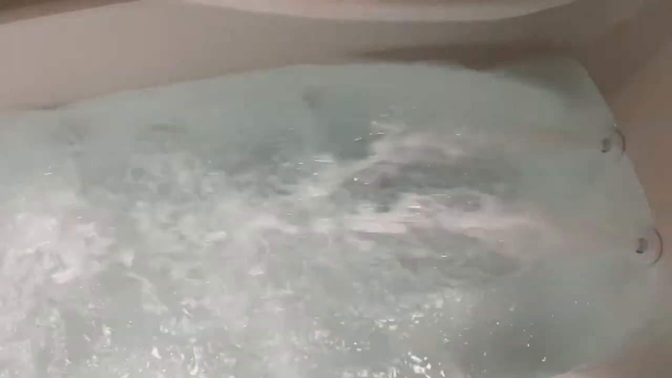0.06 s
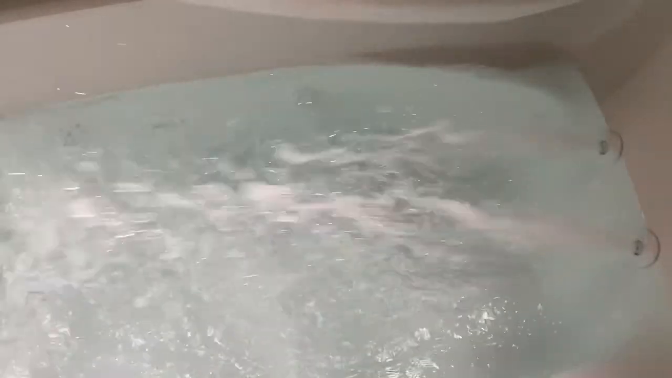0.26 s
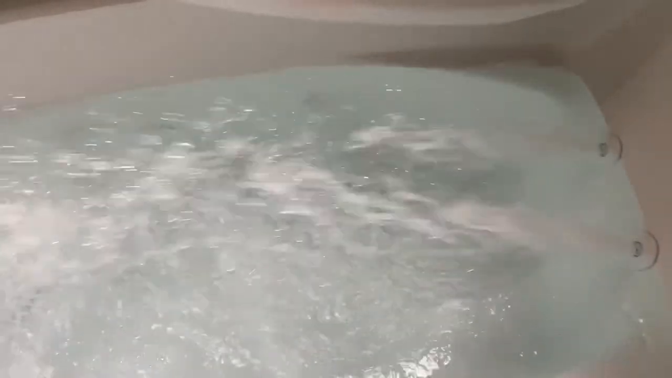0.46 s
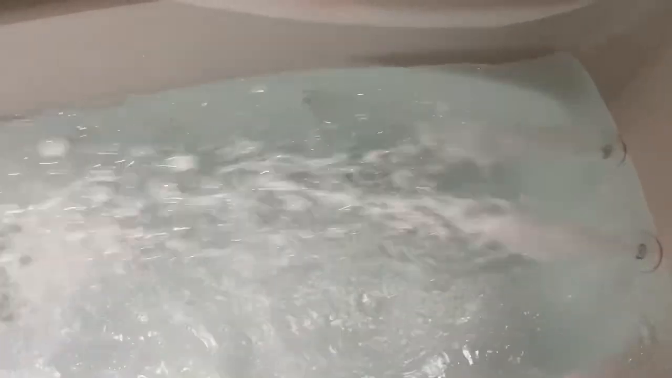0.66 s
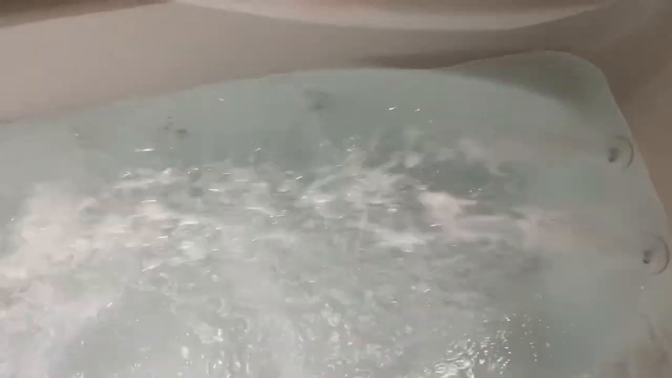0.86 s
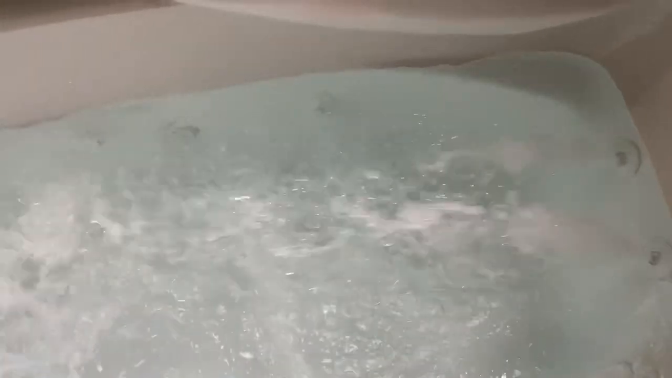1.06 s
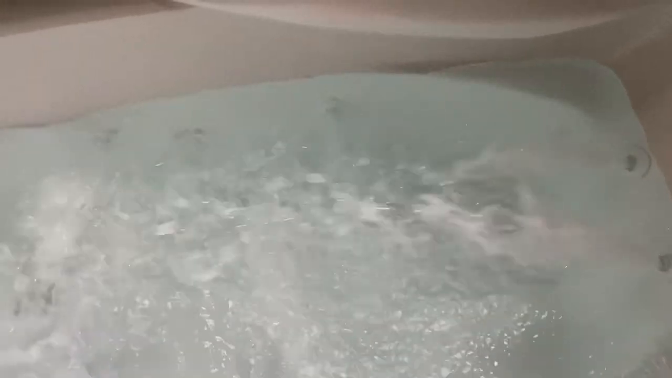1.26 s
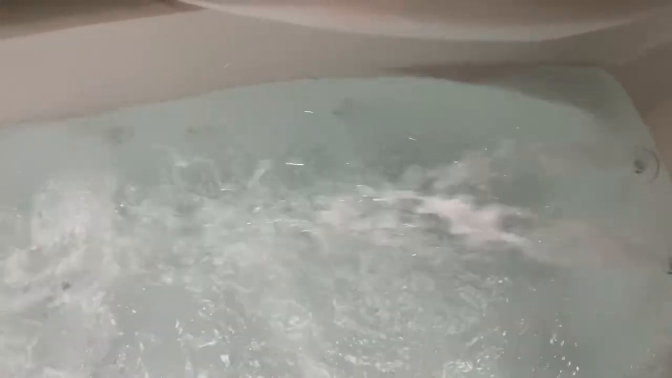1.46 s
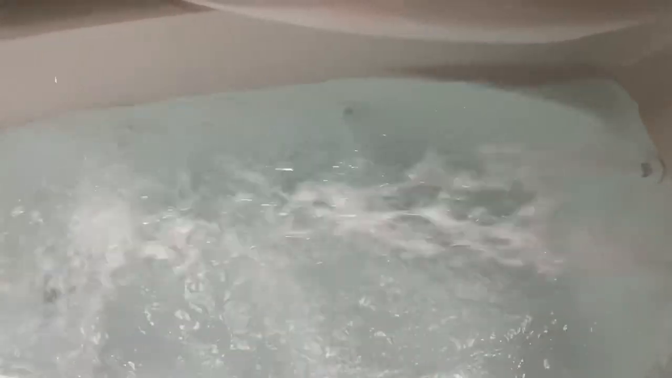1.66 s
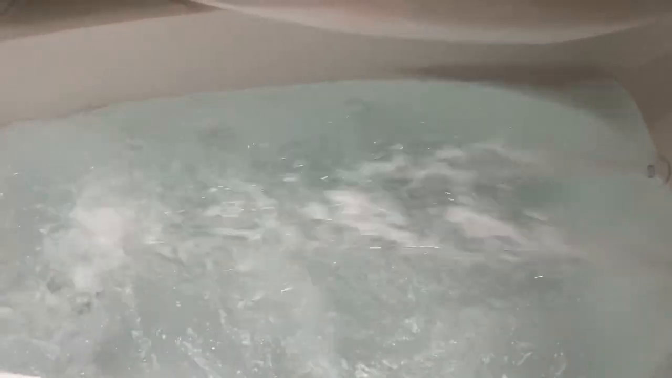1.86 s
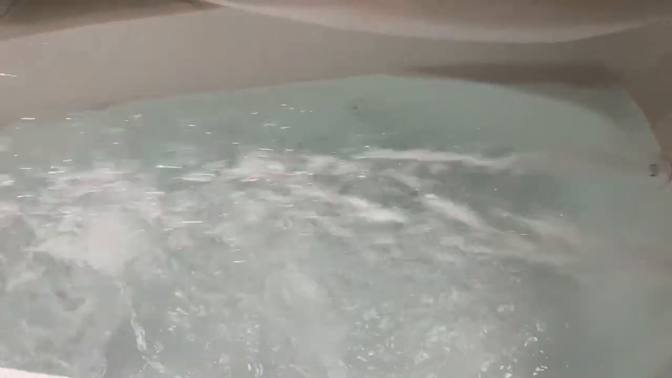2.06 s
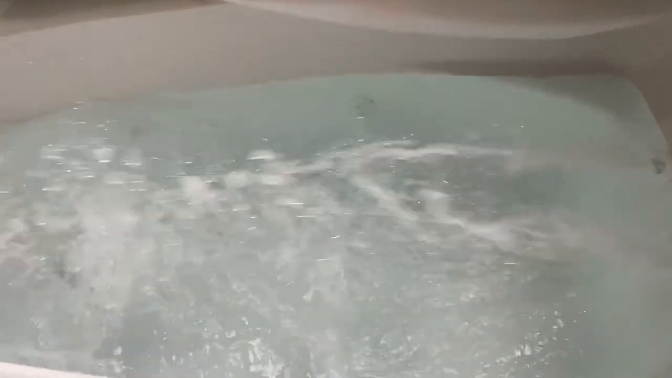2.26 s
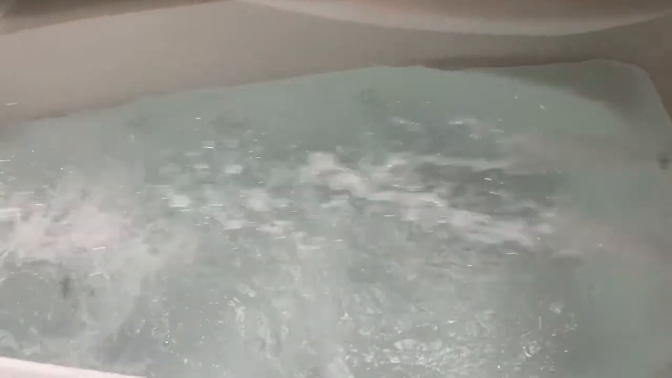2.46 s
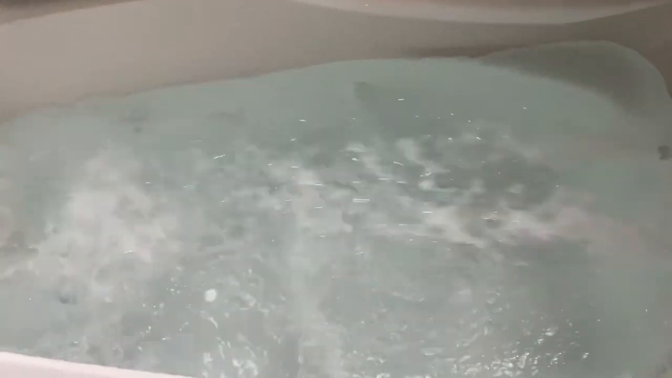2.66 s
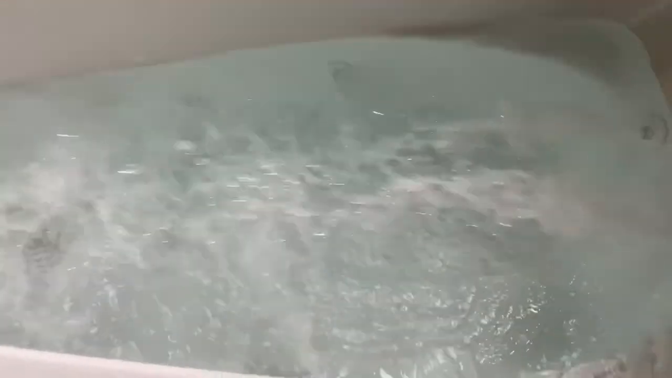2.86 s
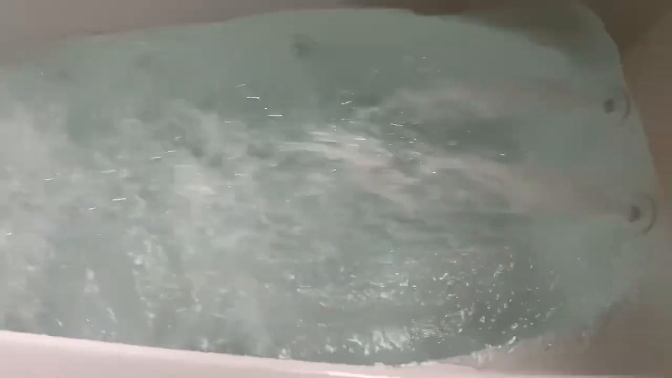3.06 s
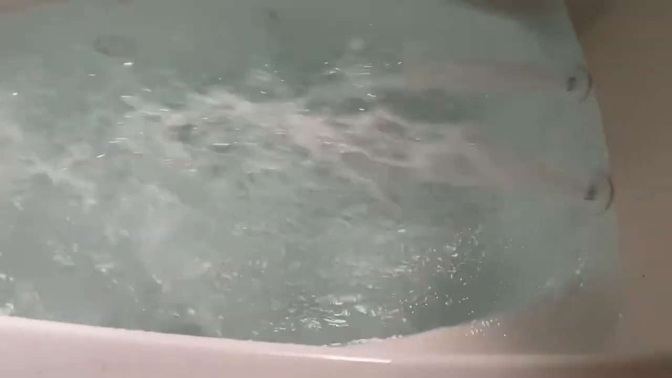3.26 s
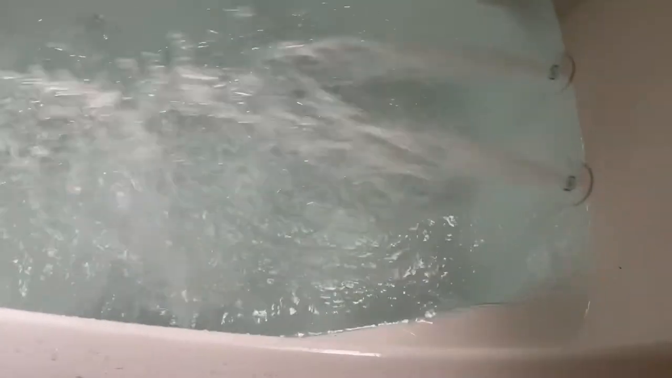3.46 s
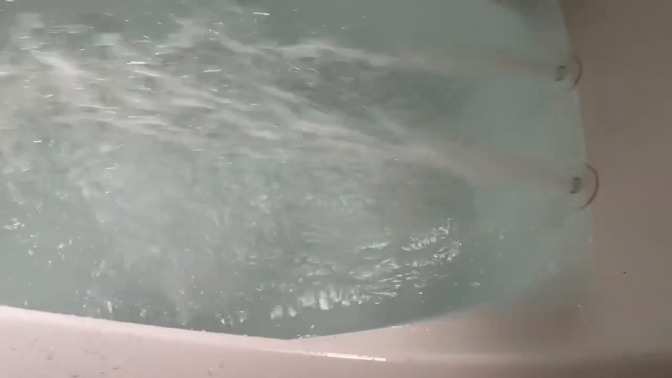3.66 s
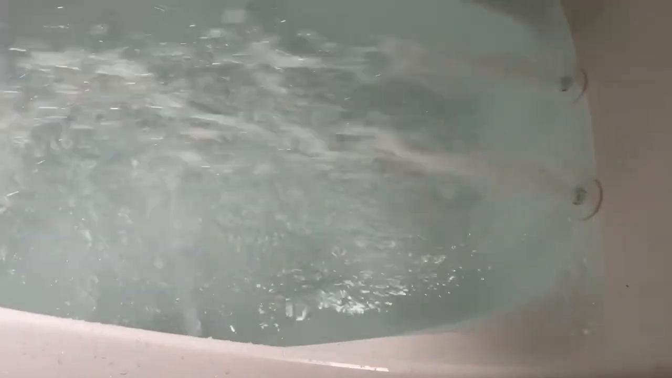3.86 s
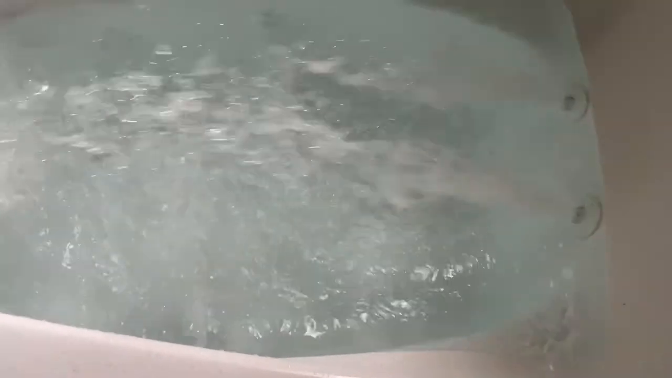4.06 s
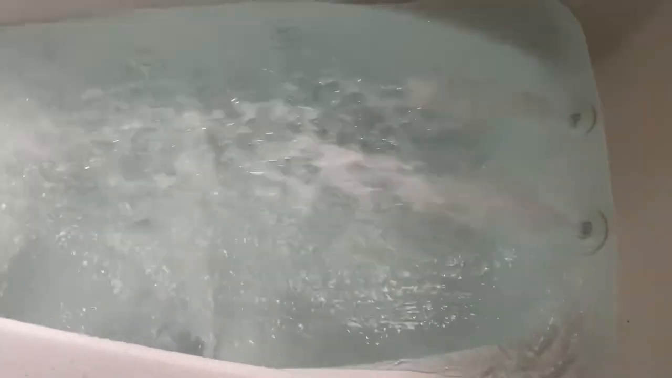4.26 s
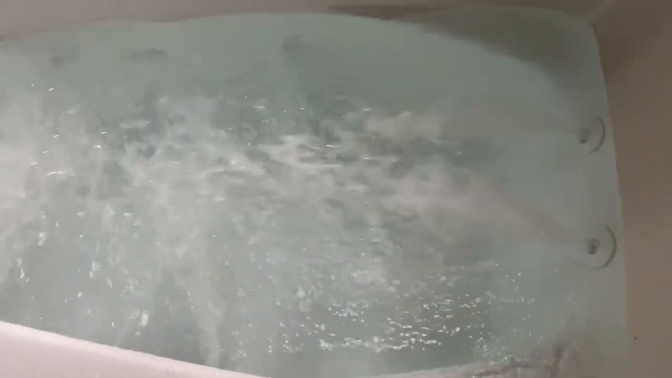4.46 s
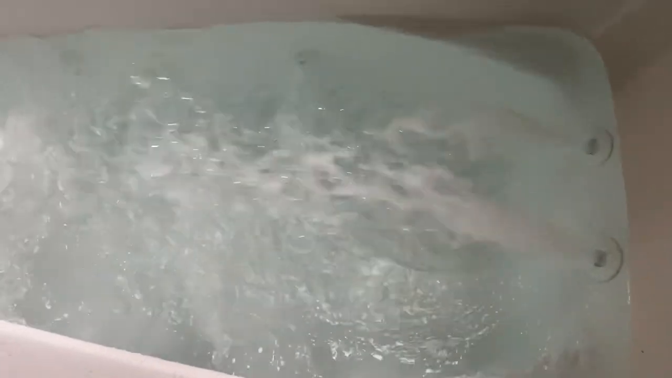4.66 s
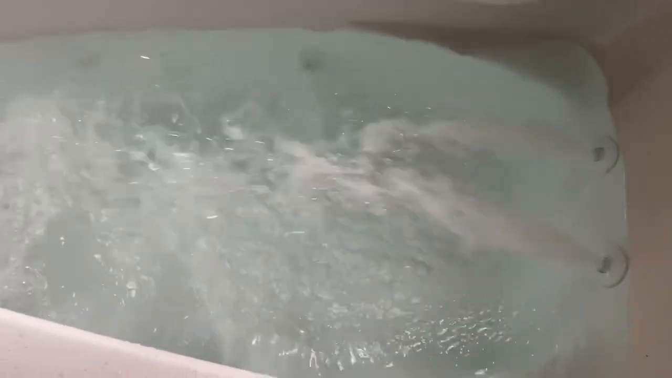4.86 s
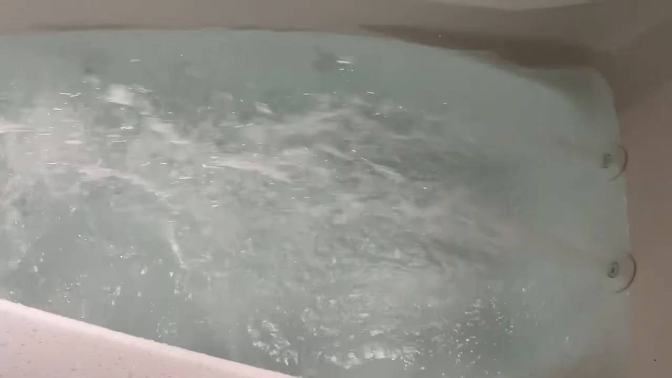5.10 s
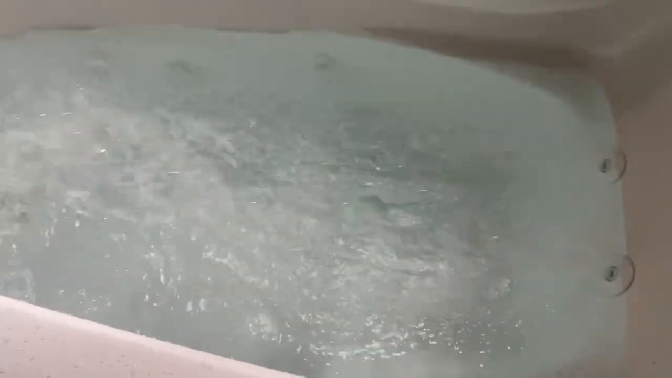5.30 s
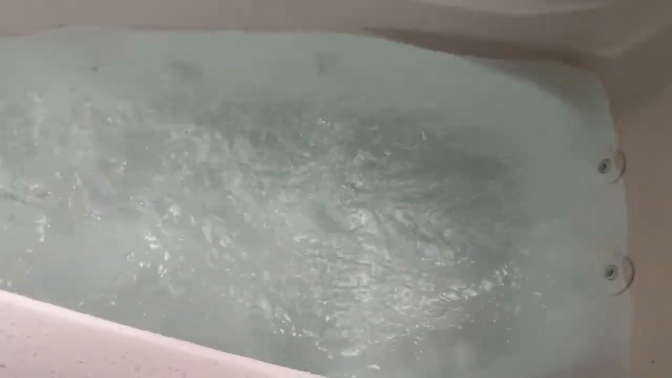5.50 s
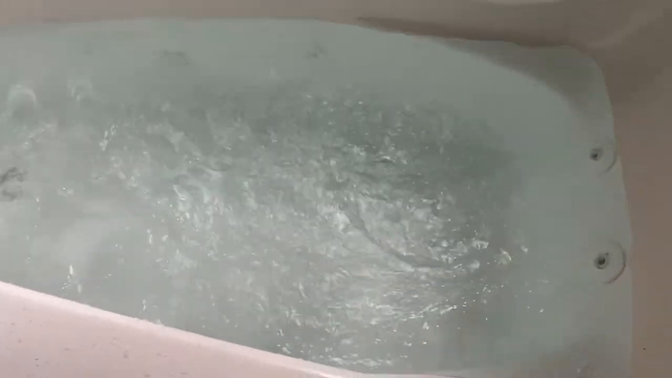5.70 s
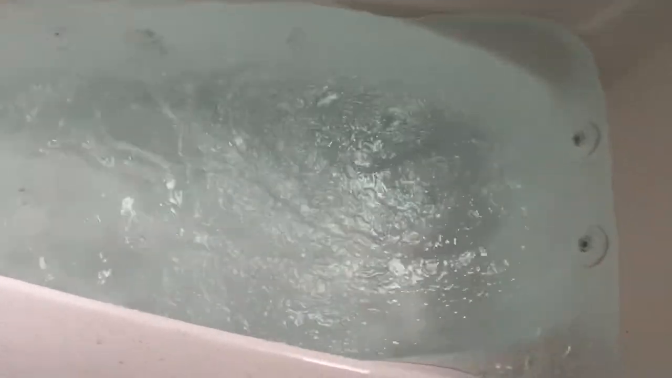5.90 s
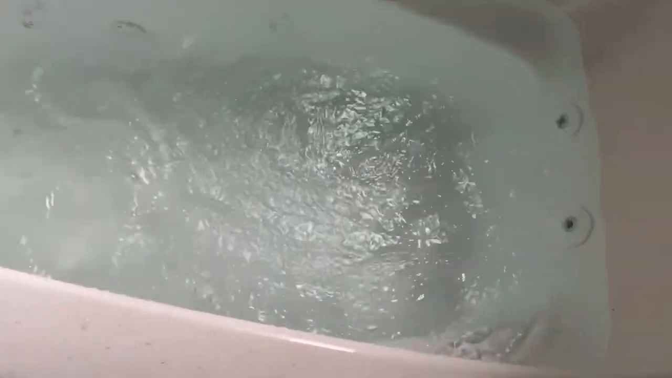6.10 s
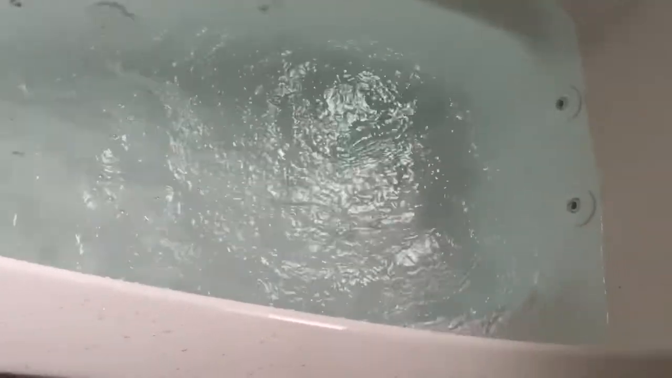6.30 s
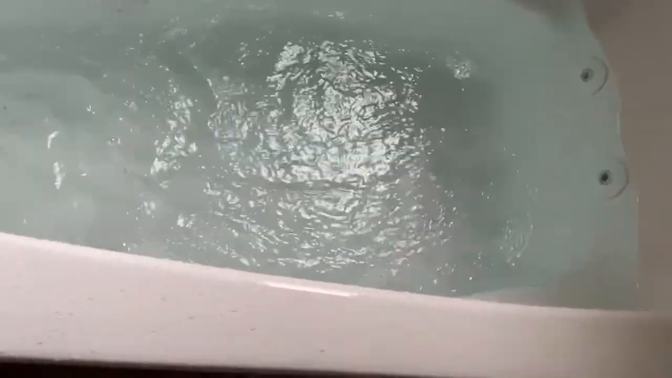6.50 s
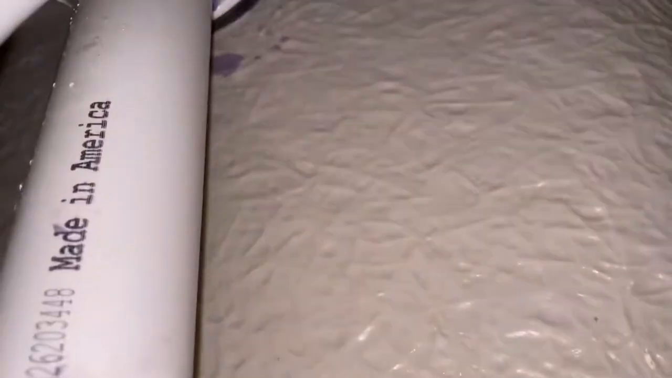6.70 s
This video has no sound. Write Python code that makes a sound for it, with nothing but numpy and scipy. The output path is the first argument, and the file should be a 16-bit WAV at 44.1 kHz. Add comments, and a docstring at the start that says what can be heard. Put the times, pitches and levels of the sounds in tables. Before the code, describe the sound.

From the start a jetted bathtub is at full power: a broad, wet churning of ringing bubbles and froth, hissing spray, and low tub rumble with a hollow pipe note and a steady low motor hum. Splashes brighten and swell around 0.4-0.9 s, with a heavy thump near 0.65, again at 2.1-2.6 with sharp slaps, and most strongly at 3.5-4.2, with a deep thump at 3.9. Gurgles and single bubble blips poke through. At about 5.0 the low drive falls away; a last splashy spurt comes at 5.2, and by 5.4 the roar has collapsed. Faint crackling foam, small gliding plops and low residual rumble fade through 5.5-6.4, with a soft lap at 6.4. After an instant of silence, at 6.54 a deep, lumpy, booming gush starts abruptly and continues to the end. Close stereo perspective, short hard-walled room tail.

```python
'''A jetted bathtub runs in a small bathroom: pump harmonics hum, and noise drives the low modes of tub and room.
Ringing bubbles, noisy froth, slaps and spray churn on top, louder whenever the bath swells and the jets break through.
Then the jets stop with a last spurt of the same layers, leaving crackling foam, a few gliding plops and a soft wash.
After an instant of silence the sound changes abruptly to a deeper gush: lumpy noise over a booming tub.'''
import sys
import numpy as np
from scipy import signal
from scipy.fft import rfft, irfft, next_fast_len
from scipy.io import wavfile
from scipy.ndimage import uniform_filter1d

SR = 44100
rng = np.random.default_rng(int(sys.argv[2]) if len(sys.argv) > 2 else 0)


def inscribe(sig):
    """Save sig as 16-bit PCM at rate SR to the path in sys.argv[1].

    A 1-D sig is mono; a 2-D sig holds one channel per row.
    Samples are clipped to [-1, 1] before scaling.
    """
    pcm = np.round(np.clip(np.atleast_2d(sig).T, -1, 1) * 32767)
    wavfile.write(sys.argv[1], SR, pcm.astype(np.int16))


N = 297234


def from_db(db):
    """Turns decibels into a plain factor for the wave."""
    return 10 ** (np.asarray(db) / 20)


def rms_one(x):
    """Scales a sound to an average strength (rms) of 1."""
    return x / np.sqrt(np.mean(x ** 2) + 1e-20)


def in_time(rows):
    """The columns of a curve at every sample."""
    s, *columns = np.transpose(rows)
    return [np.interp(np.arange(N) / SR, s, c) for c in columns]


def at_hz(points, hz):
    """Reads a table on a log-frequency axis."""
    table = np.array(points)
    return np.interp(np.log(np.maximum(hz, 1)), np.log(table[:, 0]), table[:, 1])


def add(out, s, sound):
    """Mixes a sound in from time s."""
    size = out.shape[-1]
    start = int(np.clip(s * SR, 0, size - 1))
    out[..., start:start + sound.shape[-1]] += sound[..., :size - start]


def held(start_s, hold_s, attack_s, fall_db_per_s):
    """An envelope that rises, holds until hold_s after its start and dies away."""
    t = np.arange(N) / SR - start_s
    return np.clip(t / attack_s, 0, 1) * from_db(-fall_db_per_s * np.maximum(t - hold_s, 0))


def drift(rate):
    """Slow random wandering of spread 1, smoothed above about rate (Hz)."""
    # drawn once every 40 samples, then joined by straight lines
    r = np.exp(-80 * np.pi * rate / SR)
    noise = rng.standard_normal(N // 40 + 2002)
    slow = signal.lfilter([1], [1, -2 * r, r * r], noise)[2000:]
    return np.interp(np.arange(N) / 40, np.arange(len(slow)), rms_one(slow))


def bursts(per_s, decay_s):
    """Power of random bursts that start at once and die away; mean 1."""
    hits = (rng.random(N) < per_s / SR) * np.minimum(rng.exponential(1, N), 4) ** 2
    power = signal.lfilter([1], [1, -np.exp(-1 / (decay_s * SR))], hits + 1e-12)
    return power / power.mean()


def coloured(x, spectrum):
    """Gives a sound a spectrum; rms 1."""
    size = next_fast_len(N)
    gain = from_db(at_hz(spectrum, np.arange(size // 2 + 1) * SR / size))
    return rms_one(irfft(rfft(x, size) * gain, size)[..., :N])


def flickering(power, spectrum):
    """Coloured noise whose strength follows a power curve; rms 1."""
    return coloured(rng.standard_normal((2, N)) * np.sqrt(power), spectrum)


def splashing(spectrum, per_s, decay_s, wide_share, narrow_share):
    """Half-octave bands of noise: a smooth bed, broad bursts in all bands and narrow ones in each; rms 1."""
    edges = np.geomspace(250, 16000, 13)
    white = rng.standard_normal((2, 2, N))
    wide = bursts(per_s, decay_s)
    bed = max(1 - wide_share - narrow_share, 0)
    out = 0
    for k, band in enumerate(zip(edges, edges[1:])):
        noise = signal.sosfilt(signal.butter(2, band, "band", fs=SR, output="sos"), white[k % 2])
        power = bed + wide_share * wide + narrow_share * bursts(per_s, decay_s)
        out = out + noise * np.sqrt(power)
    return coloured(out, spectrum)


def booming(modes):
    """Turbulence keeps low modes ringing at an even strength, with dark valleys between them; rms about 1."""
    out = 0
    for hz, width_hz, level_db in modes:
        r = np.exp(-np.pi * width_hz / SR)
        resonance = [1, 0, -1, 1, -2 * r * np.cos(2 * np.pi * hz / SR), r * r]
        # one second of run-up is cut off, so the mode already rings at the start
        ringing = signal.sosfilt([resonance, resonance], rng.standard_normal((2, N + SR)))[:, SR:]
        out = out + from_db(level_db) * rms_one(ringing)
    return out / np.sqrt(uniform_filter1d(out ** 2, size=6000, axis=1) + 1e-9)


def wandering(x, share, rate):
    """Lets the pitch of a sound stray a little, as the water in a pipe shifts."""
    at = np.cumsum(1 + share * drift(rate))
    return np.array([np.interp(at, np.arange(N), channel) for channel in x])


def deepened(x, deep_db, deep_hz):
    """Raises or lowers the part of a sound below deep_hz over time."""
    deep = signal.sosfiltfilt(signal.butter(2, deep_hz, fs=SR, output="sos"), x)
    return x + (from_db(deep_db) - 1) * deep


ROOM_T60_S = 0.25  # time in which the room tail falls by 60 dB


def bathroom(x, wet_db):
    """Direct sound in the middle, and a short tail from hard walls: (middle, side)."""
    t = np.arange(SR // 2) / SR
    tail = rng.standard_normal((2, len(t))) * from_db(-60 * t / ROOM_T60_S) * (t > .002)
    response = from_db(wet_db) * tail / np.sqrt(np.sum(tail[0] ** 2))
    response[0, 0] += 1  # the direct sound
    return signal.fftconvolve(x[None], response, axes=1)[:, :N]


def bubble(hz, t60, rise):
    """A bubble rings and climbs in pitch as it nears the surface."""
    t = np.arange(int(t60 * SR) + 2) / SR
    tone = np.sin(2 * np.pi * hz * t * (1 + rise * t / t60 / 2))
    return tone * from_db(-60 * t / t60) * (1 - np.exp(-t * hz))


def crowd(low_hz, high_hz, cycles, rise, size_db, wet_db, count, size=N):
    """Bubbles of all sizes burst at random moments and places, a few much louder than the rest: (middle, side)."""
    out = np.zeros((2, size))
    for when, pitch, bulk, damping, climb, place in rng.random((count, 6)):
        hz = low_hz * (high_hz / low_hz) ** pitch
        strength = from_db(size_db * min(-np.log(1 - bulk), 3)) * hz
        sound = strength * bubble(hz, cycles * (.5 + damping) / hz, 2 * rise * climb)
        add(out, when * size / SR, np.outer([1, 2 * place - 1], sound))
    return (bathroom(out[0], wet_db) + bathroom(out[1], wet_db)[::-1])[:, :size]


# How strong the pump is. Each row: time in seconds, level in dB.
PUMP_LEVEL = [(0, -6.5), (3.0, -1.5), (3.6, 1), (5.0, -1.5), (5.25, -19), (5.5, -50)]
# The notes of the motor. Each row: multiple of the mains pitch, level in dB before the pump level is added.
MOTOR_HUM = [(1, -41.5), (2, -42), (3, -50), (4, -42.5), (14, -49.5)]
MAINS_HZ = 60.25


def pump(waver_db=3.0, sway_rad=0.36):
    """Mains harmonics of the motor, wavering with the load."""
    turn = 2 * np.pi * MAINS_HZ * np.arange(N) / SR
    hum = 0
    for multiple, level_db in MOTOR_HUM:
        strength = from_db(level_db + waver_db * drift(4.5)) * np.sqrt(2)
        hum = hum + strength * np.sin(multiple * turn + sway_rad * drift(3.3))
    return hum * from_db(in_time(PUMP_LEVEL)[0]) * [[1], [0]]  # middle only


# The colour of the foam. Each row: pitch in Hz, gain in dB.
FOAM_COLOUR = [(150, -6), (500, -10), (1200, -19), (2300, -17), (3100, 1.5), (4000, 0), (6000, -9),
               (10000, 6.5), (13000, 3), (15500, -1)]
# The foam left on the surface. Each row: time in seconds, level in dB.
FOAM_LEVEL_CURVE = [(0, -38.5), (5.5, -45), (5.9, -50), (6.2, -53), (6.5, -62)]


def foam():
    """The foam on the surface crackles faintly in tiny bursts and thins out, faster once the jets stop."""
    crackle = flickering(1 + bursts(per_s=300, decay_s=0.0046), FOAM_COLOUR)
    return from_db(in_time(FOAM_LEVEL_CURVE)[0]) * crackle


def drips(level_db=-68):
    """Small stray bubbles keep surfacing, ever fainter, as the bath settles."""
    level = from_db(level_db) * held(start_s=5.35, hold_s=0.69, attack_s=.015, fall_db_per_s=87)
    strays = crowd(low_hz=600, high_hz=1500, cycles=35, rise=.3, size_db=0, wet_db=-10, count=800)
    return level * rms_one(strays)


# The colour of the small wave. Each row: pitch in Hz, gain in dB.
WASH_COLOUR = [(200, -4), (450, 1), (700, -5), (1500, -2), (2500, -11), (5000, -24)]
WASH_S, WASH_HALF_S, WASH_DB = 6.425, 0.086, -59  # middle and half length in seconds, level in dB


def wash():
    """A small wave of the settling water laps once, softly, against the tub."""
    hump = np.exp(-((np.arange(N) / SR - WASH_S) / WASH_HALF_S) ** 2)
    return from_db(WASH_DB) * hump * flickering(1 + bursts(per_s=140, decay_s=.005), WASH_COLOUR)


# Single large bubbles. Each row: start in seconds, starting peak in dB, pitch in Hz, length in seconds,
# change of pitch by the end as a share (below 0 it sinks).
LARGE_BUBBLES = [(0.538, -25.5, 1054, 0.035, 0.061), (0.602, -24.5, 1284, .022, .1),
                 (1.458, -25, 1285, 0.022, 0.086), (1.635, -23.5, 1083, 0.03, -0.06),
                 (1.689, -19, 1080, 0.02, 0.12), (1.689, -20, 1350, 0.024, 0.29),
                 (1.726, -24, 1740, .02, 0.06), (2.152, -24, 1470, 0.016, .1),
                 (2.453, -24, 1930, 0.023, 0.15), (2.925, -22, 2184, 0.02, 0.04),
                 (3.226, -24.5, 1095, 0.019, 0.2), (3.483, -23.5, 1370, 0.034, 0.23),
                 (3.547, -21, 1230, .016, 0.17), (3.668, -25, 1245, .018, .1),
                 (3.861, -24, 1310, .022, 0.05), (4.571, -25, 1240, .02, .05),
                 (4.871, -23, 2140, 0.022, .04), (5.207, -24, 400, 0.018, -0.15),
                 (5.207, -21, 1870, 0.018, .06), (5.208, -21, 1550, 0.014, 0.07),
                 (5.238, -23, 2050, .018, .08), (5.295, -22, 1260, 0.01, -0.039),
                 (5.339, -31, 920, 0.02, 0.077), (5.378, -36, 1300, .02, .1), (5.396, -37, 1260, .02, .05),
                 (5.439, -42, 1254, 0.027, .15), (5.637, -47, 870, 0.045, .06), (5.64, -57, 1100, .02, .35),
                 (5.67, -46, 950, .022, 0), (5.67, -47, 730, .028, .04), (5.716, -48, 2200, .025, .02),
                 (5.717, -45, 675, .03, 0.22), (5.724, -48, 940, .018, .1), (5.741, -46, 1150, 0.018, 0.55),
                 (5.78, -46, 680, 0.022, .06), (5.828, -56, 830, .02, .1), (5.845, -47, 1350, .008, .3),
                 (5.853, -51, 730, .018, 0), (5.857, -55, 1050, .025, .45), (5.877, -41, 674, 0.015, 0.1),
                 (5.879, -48, 890, .025, 0.07), (5.951, -45, 710, 0.022, 0), (5.953, -49, 860, .04, .1),
                 (5.967, -47, 305, 0.038, -0.04), (6.002, -59, 1100, .018, .45),
                 (6.077, -51, 1420, .012, 0.3), (6.087, -52, 630, 0.042, 0.02),
                 (6.117, -51, 3520, .02, .03), (6.18, -49, 3830, .022, 0.058),
                 (6.203, -54, 3160, .022, -0.01), (6.408, -52, 427, .025, .1),
                 (6.434, -49, 1460, 0.013, 0.22)]
PLOP_WOBBLE = 0.015  # random wobble of the pitch, as a share
PLOP_FADE_DB = 9  # steady fade over the life of a bubble, besides its rounded end


def plops():
    """Large bubbles surface one by one: each rings, wobbles, glides ever faster in pitch and pops."""
    out = np.zeros(N)
    wobbles = rng.standard_normal((len(LARGE_BUBBLES), 10))
    for (s, peak_db, hz, length_s, rise), points in zip(LARGE_BUBBLES, wobbles):
        age = np.linspace(0, 1, int(length_s * SR) + 2)
        wobble = np.interp(age, np.linspace(0, 1, len(points)), points)
        turn = 2 * np.pi * np.cumsum(hz * (1 + rise * age ** 2 + PLOP_WOBBLE * wobble)) / SR
        envelope = (1 - np.exp(-turn / np.pi)) * (1 - age ** 4)
        add(out, s, np.sin(turn) * envelope * from_db(peak_db - PLOP_FADE_DB * age))
    return bathroom(out, wet_db=-8)


# Pockets of air. Each row: start in seconds, hold in seconds, level in dB, middle pitch in Hz.
AIR_POCKETS = [(0.13, .15, -35, 1204), (1.367, 0.037, -31.5, 790), (1.696, 0.045, -31, 1900),
               (3.387, .05, -33, 1110), (3.474, .08, -33, 1360), (3.61, 0.055, -34, 1400),
               (3.785, 0.085, -30.5, 1175), (4.106, 0.046, -32, 2220), (5.263, 0.022, -41, 1750),
               (5.324, 0.01, -38, 3140), (5.364, 0.086, -47, 1350), (5.367, 0.061, -47.5, 2060)]
GURGLE_SPREAD = 1.334  # pitches span this ratio above and below the middle


def gurgles():
    """A pocket of air breaks up into a quick run of bubbles close in pitch."""
    out, size = np.zeros((2, N)), SR // 2
    for s, hold_s, level_db, hz in AIR_POCKETS:
        run = crowd(low_hz=hz / GURGLE_SPREAD, high_hz=hz * GURGLE_SPREAD, cycles=20, rise=0.08,
                    size_db=1.5, wet_db=-4.5, count=320, size=size)
        envelope = held(0, hold_s, attack_s=.015, fall_db_per_s=208)[:size]
        add(out, s, from_db(level_db) * envelope * rms_one(run))
    return out


# Trapped air spitting through the surface. Each row: start in seconds, peak in dB, pitch in Hz.
AIR_SPITS = [(0.406, -13.5, 10600), (2.113, -12.5, 4000), (3.9828, -15.5, 3100), (5.162, -21, 4300),
             (5.341, -22.5, 3350), (5.5762, -28, 3600)]
SPIT_SPREAD = 1.25  # the hiss spans this ratio above and below its pitch


def spits(wet_db=-9):
    """A pinch of air spits out: a few milliseconds of narrow hiss, then the ring of the room."""
    out, size = np.zeros(N), SR // 10
    envelope = held(0, hold_s=.005, attack_s=0.00054, fall_db_per_s=4000)[:size]
    for s, peak_db, hz in AIR_SPITS:
        band = [hz / SPIT_SPREAD, hz * SPIT_SPREAD]
        band_filter = signal.butter(2, band, "band", fs=SR, output="sos")
        hiss = rms_one(signal.sosfilt(band_filter, rng.standard_normal(size)))
        add(out, s, from_db(peak_db) * np.tanh(hiss / 2) * envelope)  # tanh rounds off the peaks
    return bathroom(out, wet_db)


# Crests slapping down. Each row: start in seconds, rough peak in dB, time to fall 60 dB in seconds,
# brightest pitch in Hz.
CRESTS = [(0.405, -13, 0.077, 10500), (0.463, -10.5, 0.071, 2500), (0.475, -11, 0.11, 3200),
          (0.55, -9, 0.039, 3500), (0.651, -7.5, 0.091, 4200), (1.058, -11.5, 0.061, 4840),
          (2.114, -13.5, 0.63, 5100), (2.113, -11, 0.32, 9900), (2.14, -14, 0.12, 2210),
          (2.152, -9, .07, 3000), (2.23, -6.5, 0.14, 4250), (2.2305, -11, .07, 10800),
          (2.264, -13, .06, 3600), (2.624, -9.5, 0.11, 4500), (2.799, -17, 0.054, 4200),
          (3.728, -11.5, 0.16, 4560), (3.9832, -9, 0.028, 10500), (4.0858, -9.5, 0.15, 4570),
          (4.275, -10, 0.16, 3700), (4.4616, -11.5, 0.073, 10200), (5.191, -12.5, 0.09, 5580),
          (5.208, -15, .06, 480), (5.2115, -9, .035, 1900), (5.213, -15, .05, 6200),
          (5.2435, -10.5, 0.022, 1300), (5.272, -15.5, .08, 5000), (5.338, -23, .06, 3100),
          (5.359, -25, .04, 3400), (5.381, -26, .04, 2200), (5.403, -29, .04, 2300),
          (5.437, -33, .07, 1900), (5.582, -35, 0.11, 2600), (5.845, -38, .025, 1600)]


def slaps(breadth=0.81):
    """A crest falls over: a sudden splash, brightest around one pitch, that dies quickly."""
    out, t = np.zeros((2, N)), np.arange(SR // 4) / SR
    for s, peak_db, t60, hz in CRESTS:
        sharpness = max(1 / breadth, hz / 4000)  # the bright band is at most 4000 Hz wide
        splash = signal.lfilter(*signal.iirpeak(hz, sharpness, fs=SR), rng.standard_normal((2, len(t))))
        add(out, s, rms_one(splash) * from_db(peak_db - 60 * t / t60))
    # the peaks of a splash stand well above its rms
    return from_db(-10.5) * out


# Low modes of tub, room and pipe. Each row: pitch in Hz, width in Hz of each of its two stacked resonators,
# level in dB beside the other modes of the table.
HEAVE_RINGS = [(57.9, 15, 2.5), (63.5, 16.4, -0.5), (44, 14, -9)]
SURGE_RINGS = [(108.5, 15.6, 0.23), (121.5, 10.8, 2.4), (135, 52, -0.65)]
TUB_RINGS = [(180, 43, -8), (217.8, 14, 0), (243.8, 31, -1.5), (390, 79, -6)]
PIPE_RING = [(304.6, 20.7, 0)]
# The colour of the plunging thuds. Each row: pitch in Hz, gain in dB.
THUD_COLOUR = [(25, -14), (45, -6), (90, -4.5), (150, -9), (210, 2.5), (275, -6.5), (340, 0), (480, -5.5),
               (800, -8.5), (2000, -32)]


def rumble(heave_db, surge_db, plunge_db, pipe_db):
    """The heaving surface and the plunging jets drive the low modes of tub, room and pipe."""
    heave_band = signal.butter(2, [38, 95], "band", fs=SR, output="sos")
    heave = signal.sosfilt(heave_band, booming(HEAVE_RINGS))
    surge = booming(SURGE_RINGS)
    tub = booming(TUB_RINGS)
    thuds = flickering(.5 + bursts(per_s=60, decay_s=0.028), THUD_COLOUR)
    pipe = wandering(booming(PIPE_RING), share=.018, rate=5)
    low = from_db(heave_db - 2.0) * heave + from_db(surge_db - 1.0) * surge
    plunge = from_db(plunge_db - 3.0) * tub + from_db(plunge_db - 6) * thuds
    return low + plunge + from_db(pipe_db - 1.5) * pipe


# The colours of the froth and of the bubble crowd. Each row: pitch in Hz, gain in dB.
FROTH_COLOUR = [(200, -8), (450, -4), (600, -3), (800, -4), (1200, -1.5), (1750, 0), (2700, -5.5),
                (4500, -9.5), (10000, -20)]
BURBLE_COLOUR = [(450, 2.5), (800, -2), (1250, -1), (1700, -2), (2300, -2.5), (3600, -7.5)]


def churn(froth_db, burble_db):
    """Air from the jets breaks into a crowd of ringing bubbles and sparser, longer glugs over frothing water."""
    bubbles = crowd(low_hz=479.5, high_hz=3436, cycles=30.0, rise=.15, size_db=3.0, wet_db=-1.5, count=4600)
    glugs = crowd(low_hz=697.5, high_hz=2972, cycles=55, rise=.12, size_db=1.0, wet_db=-4.5, count=900)
    froth = splashing(FROTH_COLOUR, per_s=100, decay_s=0.0067, wide_share=0.14, narrow_share=0.29)
    burble = from_db(burble_db - 3) * coloured(bubbles, BURBLE_COLOUR)
    burble = burble + from_db(burble_db - 7.5) * coloured(glugs, BURBLE_COLOUR)
    return burble + from_db(froth_db - 2.5) * froth


# The colour of the spray. Each row: pitch in Hz, gain in dB.
SPRAY_COLOUR = [(800, -28), (2000, -7), (3400, -.3), (6000, -1.3), (7500, -1), (10300, -3), (13000, -8.5),
                (15500, -7)]


def spray(spray_db):
    """Droplets rain back and bubbles burst: hissing spatters, tiny ringing bubbles, sharp ticks, small splashes."""
    spatter = splashing(SPRAY_COLOUR, per_s=60, decay_s=0.01, wide_share=0.024, narrow_share=0.3)
    tiny = crowd(low_hz=1998, high_hz=14300, cycles=56, rise=0.16, size_db=4.0, wet_db=0, count=4200)
    fizz = coloured(tiny, SPRAY_COLOUR)
    ticks = flickering(bursts(per_s=220, decay_s=0.0036), SPRAY_COLOUR)
    splashes = flickering(bursts(per_s=26, decay_s=0.023), SPRAY_COLOUR)
    hiss = from_db(spray_db - 2.5) * spatter + from_db(spray_db - 5.5) * fizz
    return hiss + from_db(spray_db - 7.0) * (ticks + splashes)


# The bath sloshes and the jets break the surface. Each row: middle in seconds, half length in seconds,
# extra spray in dB, extra rumble in dB.
BATH_SWELLS = [(0.65, 0.32, 6, 3), (1.74, 0.1, 3, -1), (2.28, 0.19, 5, 0), (2.536, 0.13, 4, 0.5),
               (3.24, 0.024, 3.5, -1.5), (3.555, 0.083, 5.5, 0.5), (3.825, 0.13, 6.5, 1.5),
               (4.12, 0.19, 6, 1.5), (4.69, .09, 0, 0.5)]
# A body of water thumps against the tub or draws back. Each row: middle in seconds, half length in seconds,
# extra heave in dB, extra surge in dB, extra ring of the tub in dB.
TUB_THUMPS = [(0.64, 0.068, 7, 4, -0.5), (2.088, .06, 1, 1, -6), (2.455, 0.028, -3, 5, 4),
              (3.357, 0.063, 6, 1, 2), (3.925, 0.045, 10.5, 9, 9), (4.03, 0.045, 9, 6, 3),
              (4.17, 0.038, -7, -1, 6), (5.01, 0.031, 13, -2, -7)]


def humps(rows):
    """Adds up one smooth hump per row, for each column of extra dB."""
    t = np.arange(N) / SR
    return sum(np.outer(extra_db, np.exp(-((t - s) / half_s) ** 2)) for s, half_s, *extra_db in rows)


def swells():
    """Swells and thumps raise or lower the layers: extra dB of (spray, heave, surge, ring of the tub)."""
    breaking_db, rumbling_db = humps(BATH_SWELLS)
    heaving_db, surging_db, ringing_db = humps(TUB_THUMPS)
    return breaking_db, rumbling_db + heaving_db, rumbling_db + surging_db, rumbling_db + ringing_db


SETTLING_S = 5.73  # from here the leftover of each layer fades


def driven(drive, running_db, spurt_db, left, throb_db=0, throb_rate=1):
    """Level of a layer in dB: it throbs while the jets drive it, flares in the last spurt, then settles."""
    left_db, fall_db_per_s = left
    settling = from_db(left_db - fall_db_per_s * np.maximum(np.arange(N) / SR - SETTLING_S, 0))
    # the emptying pipe spurts once more
    spurt = from_db(spurt_db) * held(start_s=5.205, hold_s=0.088, attack_s=0.0089, fall_db_per_s=144)
    running = drive * from_db(running_db + throb_db * drift(throb_rate))
    return 10 * np.log10(running ** 2 + spurt ** 2 + settling ** 2)


# The boom of the tub waxes and wanes. Each row: time in seconds, extra surge in dB.
BOOM_CURVE = [(0, 5), (0.7, 2), (1.4, -4), (2.3, 3.5), (4.4, 4), (5.0, 3.5)]
# The hollow note of the pipe comes and goes. Each row: time in seconds, extra level in dB.
PIPE_NOTE_CURVE = [(0, 1), (2.4, 1.5), (2.95, 3), (3.1, -3.5), (3.7, 0), (5.0, -4.5)]
# Thrust goes first, air later: end in seconds, then fall in dB per second.
THRUST_ENDS_S, THRUST_FALL_DB_PER_S = 5.02, 101
AIR_ENDS_S, AIR_FALL_DB_PER_S = 5.31, 166
# Base levels in dB while the jets run, before the swells and the mix inside each layer.
HEAVE_DB, SURGE_DB, PLUNGE_DB, PIPE_DB = -35.5, -40, -30, -35.5
FROTH_DB, BURBLE_DB, SPRAY_DB = -28.5, -32, -31.5
# Share of the extra spray or surge dB that these follow.
FROTH_FOLLOWS, BURBLE_FOLLOWS, DEEP_FOLLOWS = 0.19, 0.022, 0.19
DEEP_HZ, DEEP_LOSS_DB = 900, 12.5  # the churning below this pitch sinks by this much without thrust


def jets():
    """Thrust drives the rumble, air drives bubbles and spray; the swells raise or lower them."""
    t = np.arange(N) / SR
    breaking_db, heaving_db, surging_db, ringing_db = swells()
    thrust = from_db(-THRUST_FALL_DB_PER_S * np.maximum(t - THRUST_ENDS_S, 0))
    air = from_db(-AIR_FALL_DB_PER_S * np.maximum(t - AIR_ENDS_S, 0))
    # left: what remains of a layer, as level in dB and fall in dB per second
    heave_db = driven(thrust, HEAVE_DB + heaving_db, spurt_db=-48, left=(-39.5, 7.4),
                      throb_db=2.0, throb_rate=1.6)
    surge_db = driven(thrust, SURGE_DB + surging_db + in_time(BOOM_CURVE)[0], spurt_db=-33.5,
                      left=(-52.5, 1.8), throb_db=0.9, throb_rate=10)
    plunge_db = driven(thrust, PLUNGE_DB + ringing_db, spurt_db=-32.0, left=(-56, 9.9),
                       throb_db=0.45, throb_rate=19)
    pipe_db = driven(thrust, PIPE_DB + in_time(PIPE_NOTE_CURVE)[0], spurt_db=-45, left=(-72, 8),
                     throb_db=3.0, throb_rate=7.6)
    froth_db = driven(air, FROTH_DB + FROTH_FOLLOWS * breaking_db, spurt_db=-46, left=(-56, 22),
                      throb_db=0.95, throb_rate=16)
    burble_db = driven(air, BURBLE_DB + BURBLE_FOLLOWS * breaking_db, spurt_db=-52, left=(-59.5, 27))
    spray_db = driven(air, SPRAY_DB + breaking_db, spurt_db=-33.0, left=(-51, 10.5),
                      throb_db=0.94, throb_rate=10.7)
    deep_db = DEEP_FOLLOWS * surging_db - DEEP_LOSS_DB * (1 - thrust)
    churning = deepened(churn(froth_db, burble_db), deep_db, DEEP_HZ)
    return rumble(heave_db, surge_db, plunge_db, pipe_db) + churning + spray(spray_db)


GUSH_START_S, HUSH_S = 6.5415, 0.007  # start of the gush, and length of the hush before it


def hush():
    """Everything drops to silence within 2 ms, for an instant before the gush."""
    t = np.arange(N) / SR
    return 1 - np.clip((t - GUSH_START_S + HUSH_S) / .002, 0, 1) * (t < GUSH_START_S)


# The colour of the gush. Each row: pitch in Hz, gain in dB.
GUSH_COLOUR = [(25, -3), (55, -2), (110, -4.5), (180, -1.5), (280, -4.5), (410, -10), (520, -10),
               (620, -13.5), (1400, -14), (2300, -20), (3200, -19.5), (5000, -27), (9000, -29.5),
               (15000, -39)]
# Modes of the tub under it. Each row: pitch in Hz, width in Hz of each of its two stacked resonators,
# level in dB beside the other modes.
GUSH_RINGS = [(44.4, 13, -12), (88, 29, -3.5), (175, 36, 0.5), (202, 20, -2), (270, 22, -11), (324, 30, -6),
              (408, 23, -12), (509, 34, -5)]
GUSH_DB, GUSH_BOOM_DB = -24, -24  # the rushing noise, and the boom of the tub


def gush():
    """A deep gush starts abruptly: lumpy noise, in many short bursts, over the booming modes of the tub."""
    opening = np.clip((np.arange(N) / SR - GUSH_START_S) / .0015, 0, 1)
    rush = flickering(1 + 0.53 * bursts(per_s=210, decay_s=0.0047), GUSH_COLOUR)
    return opening * (from_db(GUSH_DB) * rush + from_db(GUSH_BOOM_DB) * booming(GUSH_RINGS))


# How alike left and right are. Each row: pitch in Hz, likeness from 0 to 1.
STEREO_LIKENESS = [(60, 1), (130, 0.94), (280, 0.93), (620, 0.49), (1400, 0.16), (1850, 0.036),
                   (2300, 0.28), (2900, 0.28), (3800, 0.47), (6000, 0.63), (8200, 1), (9700, 0.93),
                   (11500, 0.92), (13400, 1), (14800, 1)]
# How their levels differ. Each row: pitch in Hz, left minus right in dB.
STEREO_BALANCE = [(120, 0), (500, 1.5), (1700, 3.5), (4500, 3), (6500, 1.5), (8000, -0.5)]
# How their phases differ. Each row: pitch in Hz, left minus right in radians.
STEREO_PHASE = [(100, 0), (800, .1), (1450, -.7), (2200, .2), (4200, .15), (5200, .6), (6400, -.6),
                (7300, -1.6), (8250, -3.1), (9800, -4.9), (11500, -6.3), (12800, -6.9), (14500, -9.2),
                (15800, -9.6)]


def left_and_right(field):
    """Left and right channels: alike in the bass, least alike near 1.8 kHz, shifted in phase in the treble."""
    size = next_fast_len(N + SR // 10)
    hz = np.arange(size // 2 + 1) * SR / size
    middle, side = rfft(field, size)
    alike = np.clip(at_hz(STEREO_LIKENESS, hz), 0, 1)
    side = side * np.sqrt((1 - alike) / (1 + alike))
    # each channel takes half of the balance and half of the phase
    lean = from_db(at_hz(STEREO_BALANCE, hz) / 2) * np.exp(.5j * at_hz(STEREO_PHASE, hz))
    return irfft([(middle + side) * lean, (middle - side) / lean], size)[:, :N]


def scene():
    """Pump and water, heard from above the tub."""
    background = pump() + foam() + drips() + wash()
    single_events = plops() + gurgles() + spits() + slaps()
    return left_and_right(hush() * (background + single_events + jets()) + gush())


def record(dry):
    """The deepest bass is thinned out below 32 Hz and the top is cut at 15.8 kHz."""
    thin = signal.sosfilt(signal.butter(2, 32, "high", fs=SR, output="sos"), dry)
    return signal.sosfilt(signal.ellip(10, .2, 80, 15800, fs=SR, output="sos"), thin)


dry = scene()
out = record(dry)
inscribe(out)
```